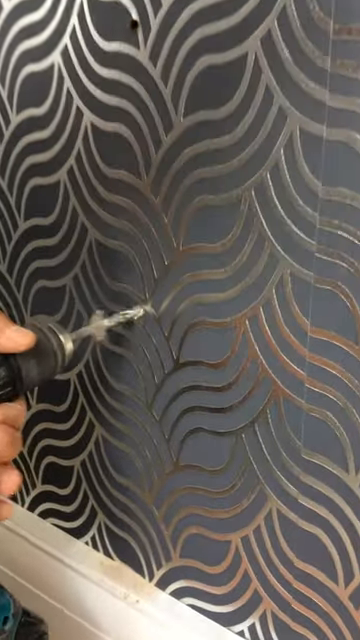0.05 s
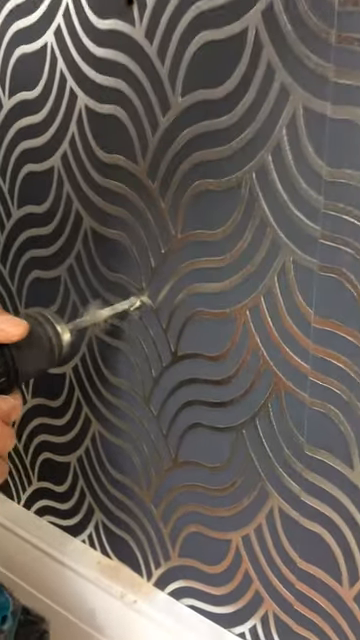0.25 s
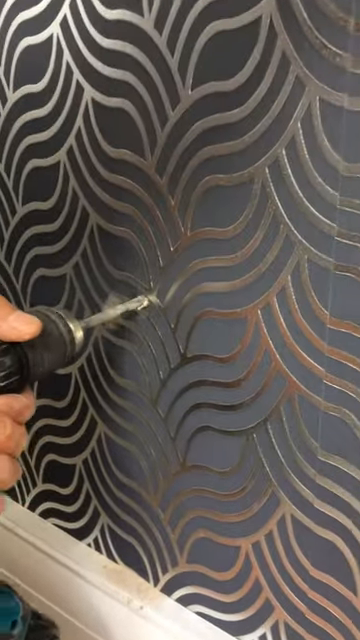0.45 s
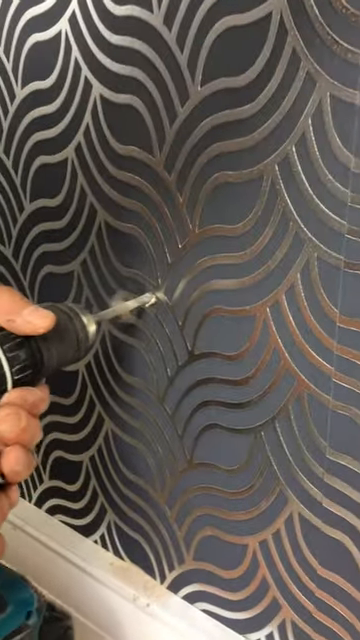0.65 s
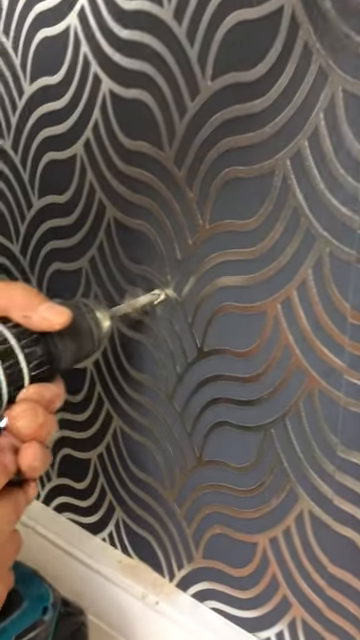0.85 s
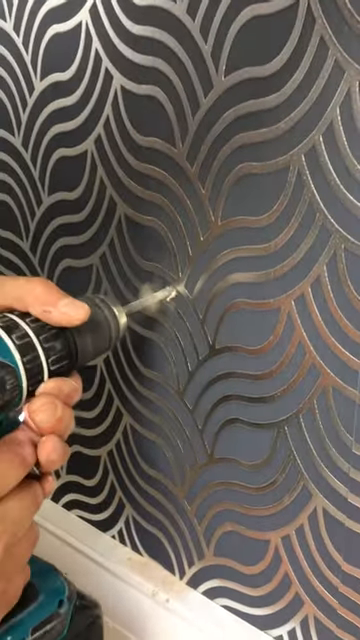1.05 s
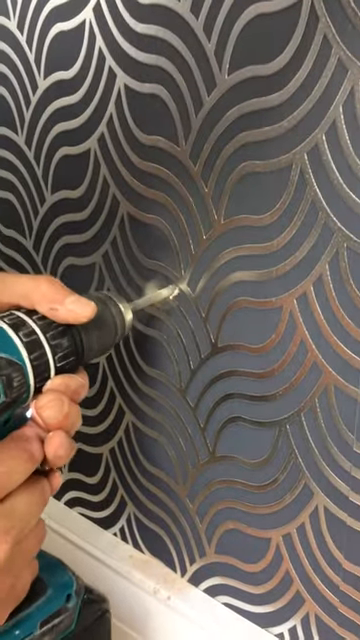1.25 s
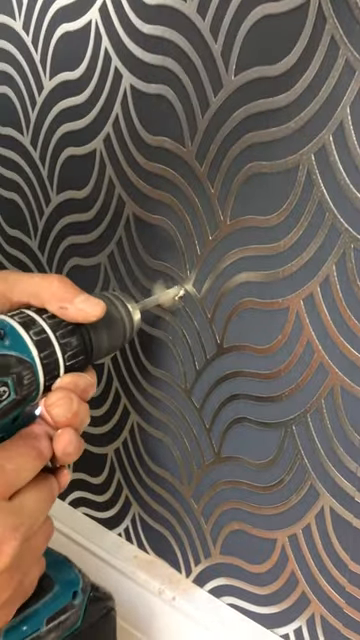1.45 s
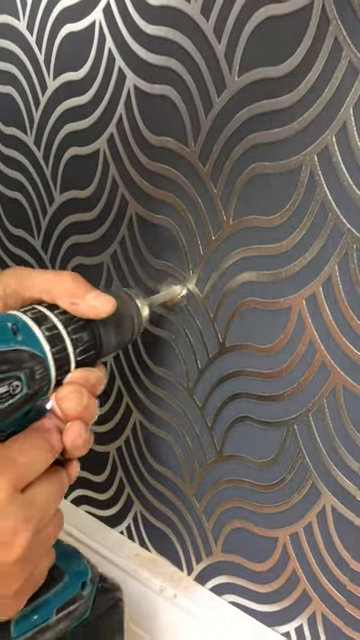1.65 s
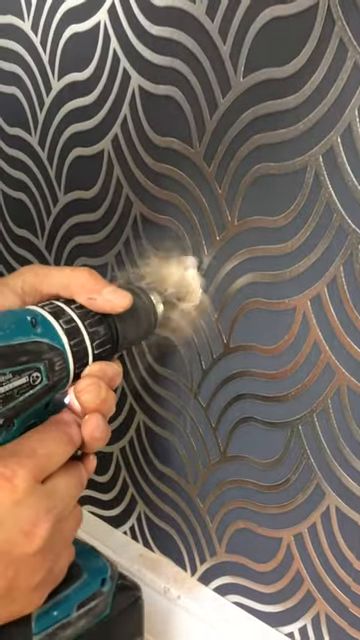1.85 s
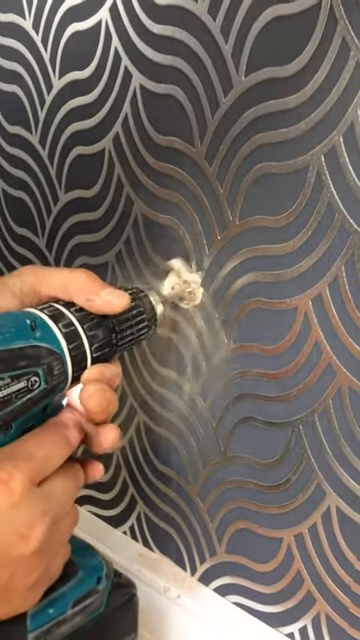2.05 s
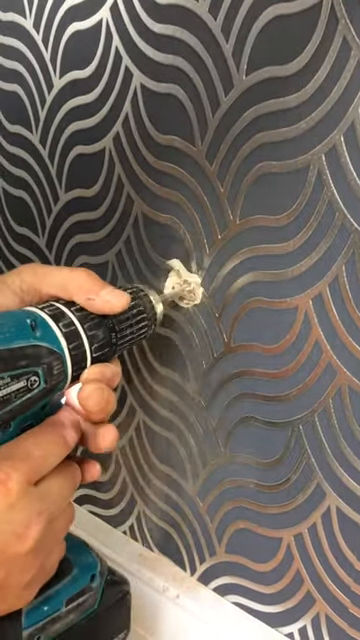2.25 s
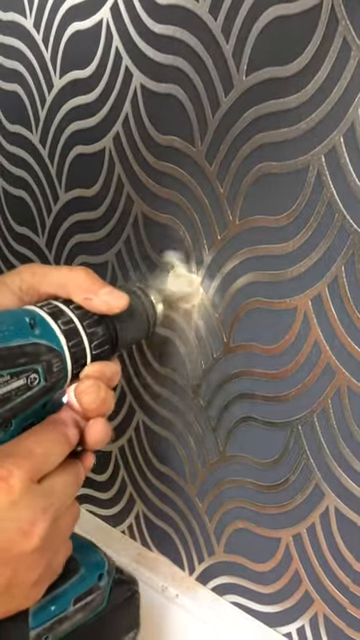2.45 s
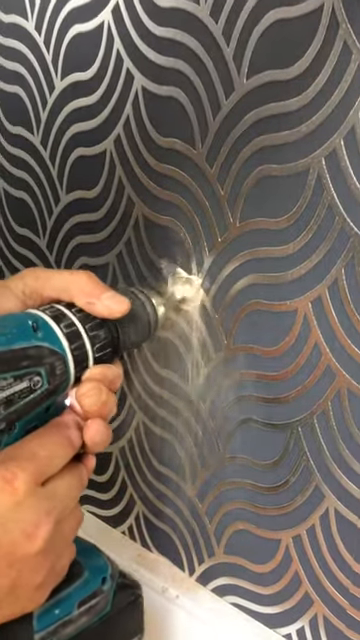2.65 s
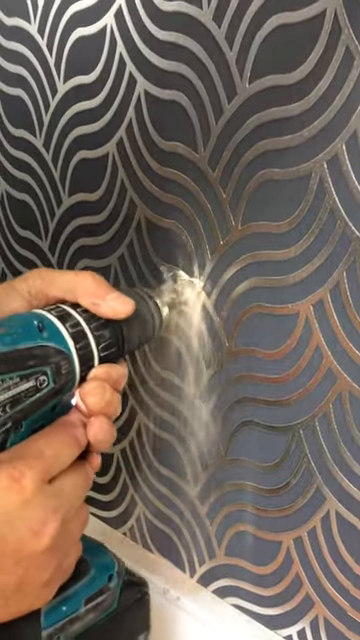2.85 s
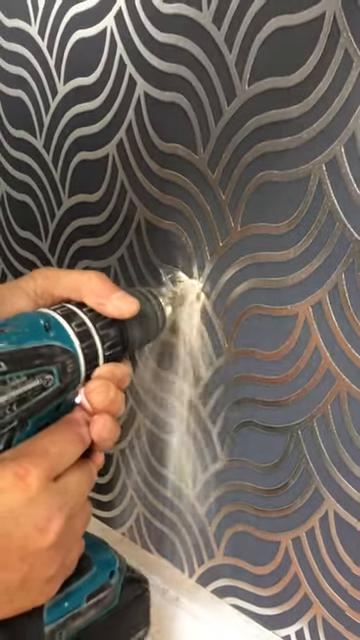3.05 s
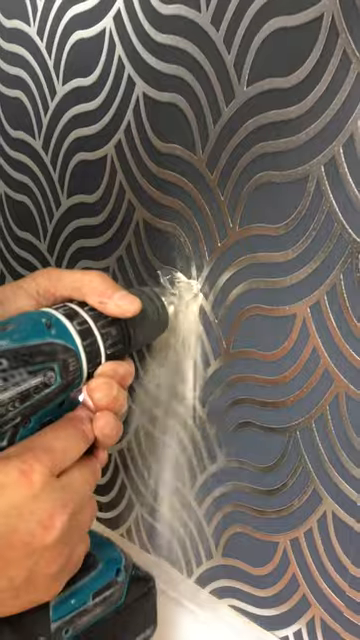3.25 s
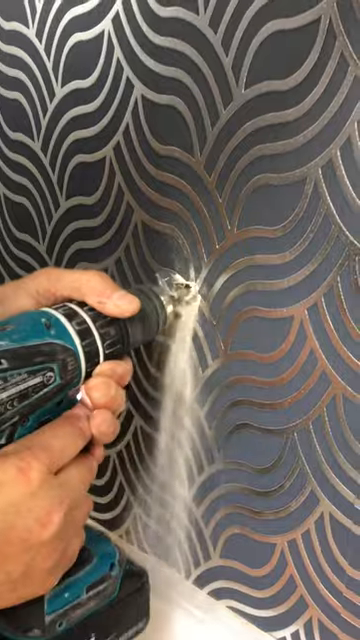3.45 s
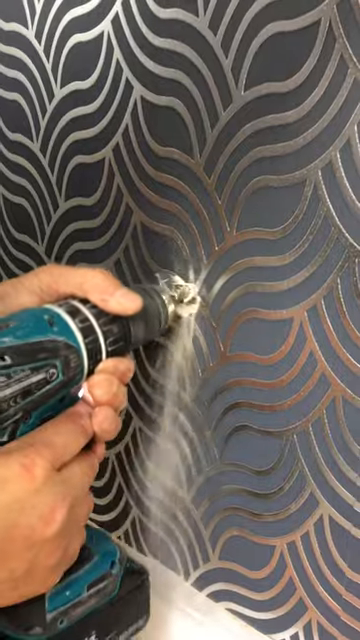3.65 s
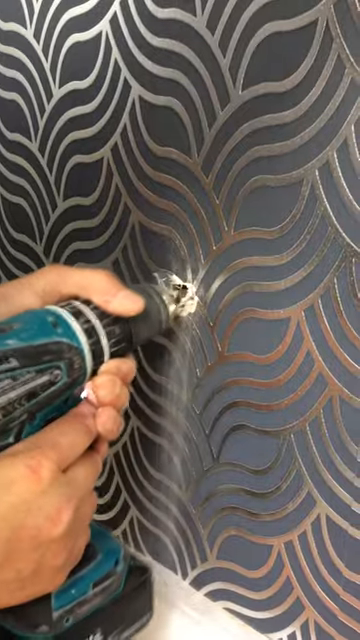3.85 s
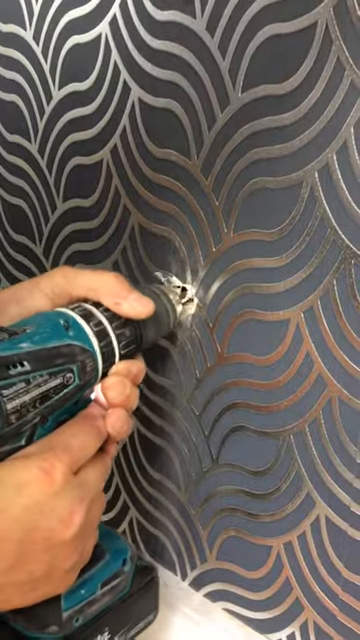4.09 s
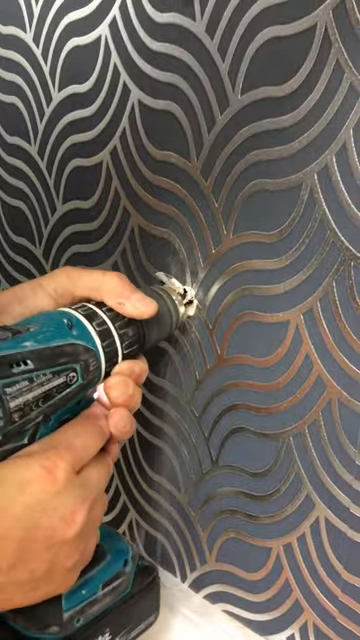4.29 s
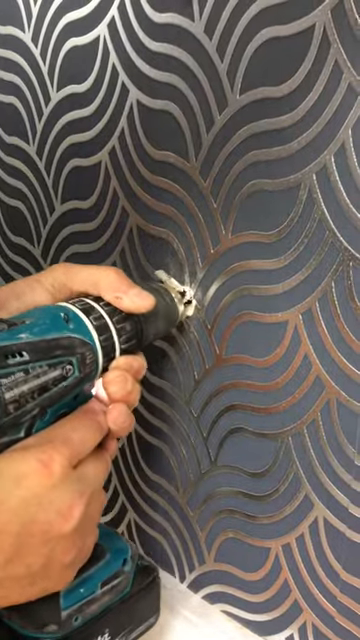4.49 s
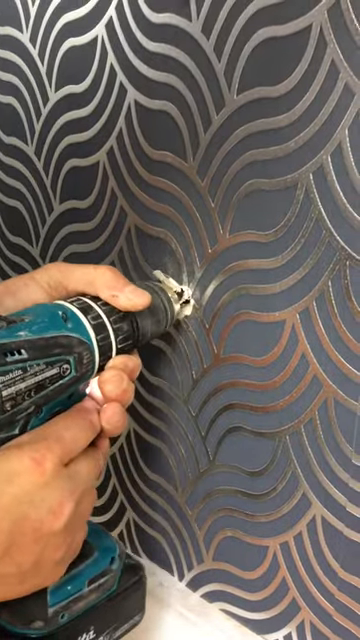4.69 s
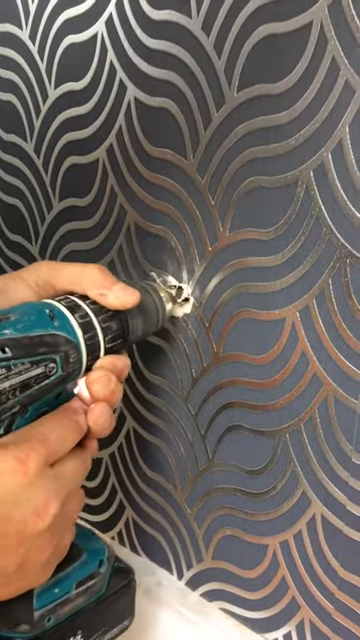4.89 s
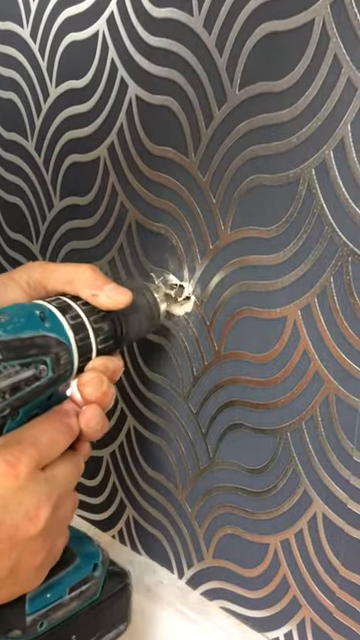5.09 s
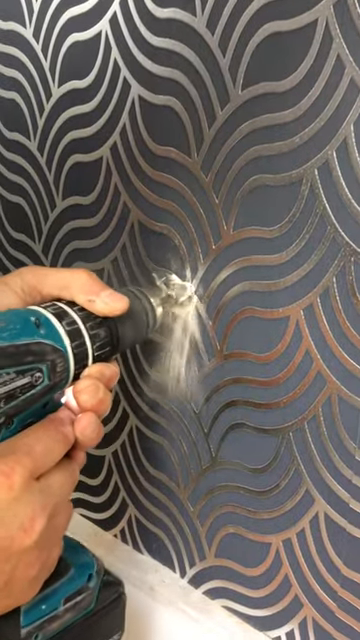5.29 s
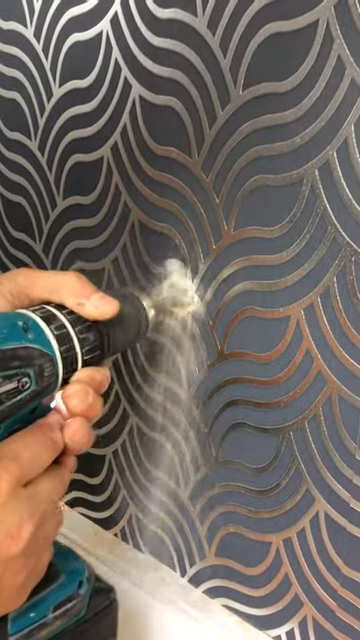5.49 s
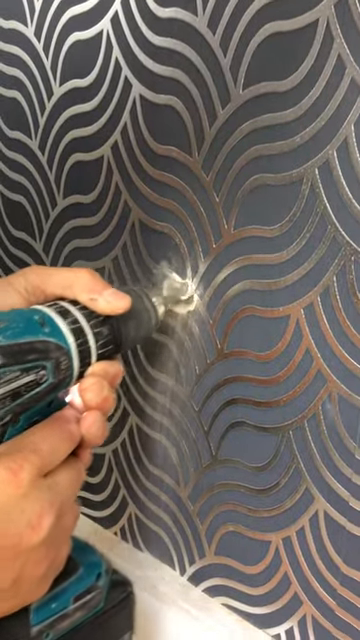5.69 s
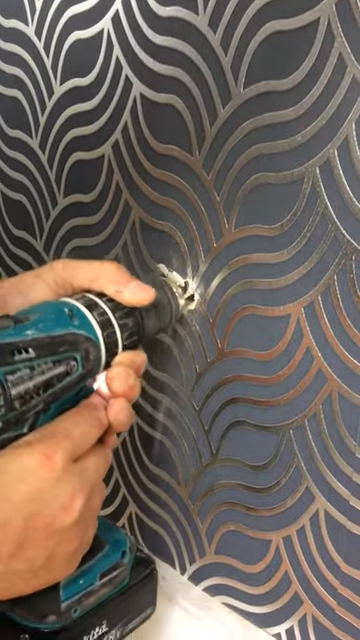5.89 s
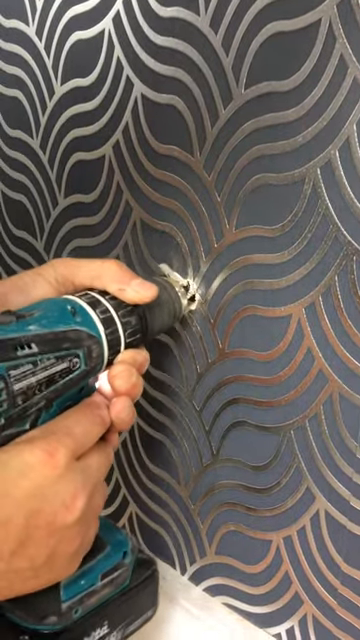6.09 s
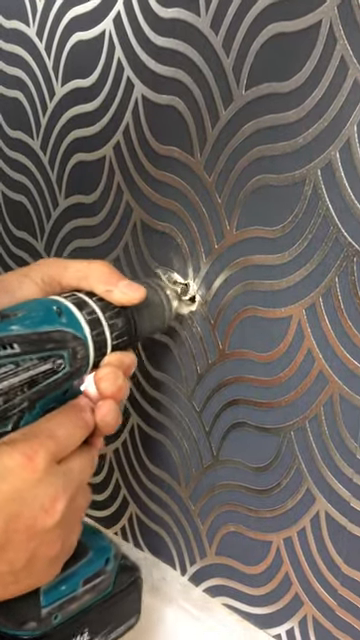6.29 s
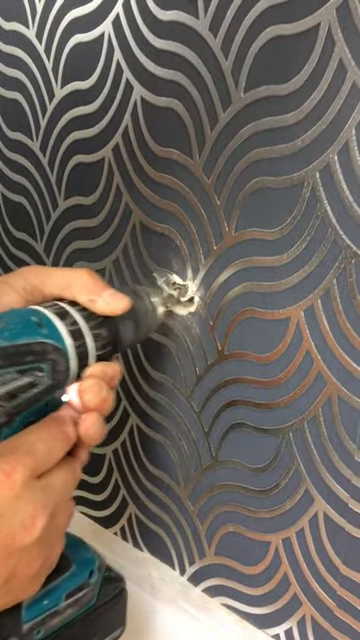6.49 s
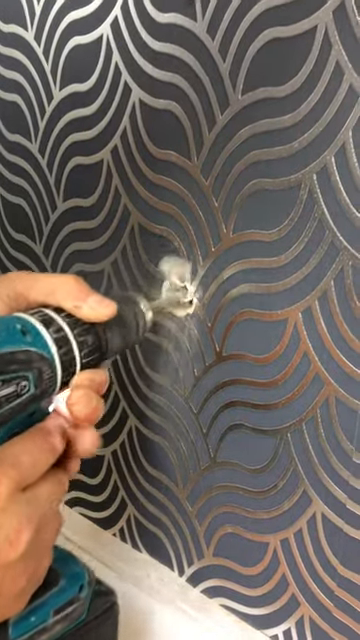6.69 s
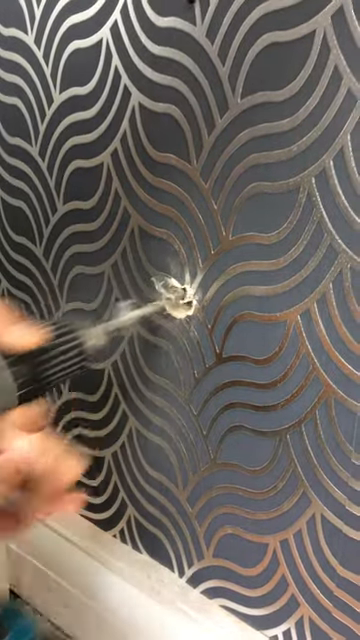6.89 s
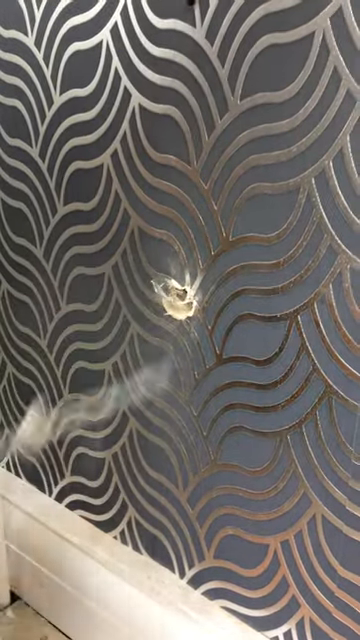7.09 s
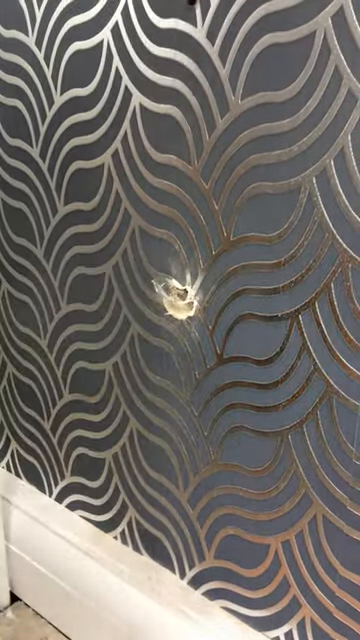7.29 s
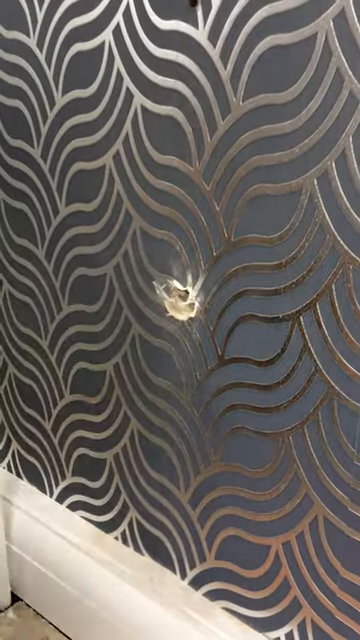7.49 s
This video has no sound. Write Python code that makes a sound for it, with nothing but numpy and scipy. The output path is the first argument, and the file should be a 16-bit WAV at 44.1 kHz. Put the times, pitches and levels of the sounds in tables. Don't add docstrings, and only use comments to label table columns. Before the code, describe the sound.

Close, centred sound of a hand-held electric drill boring into a wall indoors, with a short room tail. First a clear wavering whine over hissing dust and boxy board rumble, then a brief pause. A grinding masonry spell follows, chips cracking and the bit squeaking; the motor bogs, picks up again, slows and stops, leaving soft scrapes and clicks.

```python
import sys
import numpy as np
from scipy import signal
from scipy.fft import rfft, irfft, next_fast_len
from scipy.io import wavfile
from scipy.ndimage import uniform_filter1d

SR = 44100
rng = np.random.default_rng(int(sys.argv[2]) if len(sys.argv) > 2 else 0)


def master_out(mix):
    frames = np.transpose(np.atleast_2d(mix))
    ceiling = np.clip(frames, -1, 1)
    pcm = np.round(ceiling * 32767).astype(np.int16)
    wavfile.write(sys.argv[1], SR, pcm)


def gain_from_decibels(decibels):
    exponent = np.asarray(decibels, float) / 20
    return 10 ** exponent


N = 332514
TIME = np.arange(N) / SR

# time in seconds, tooth rate in Hz, bite in dB at 1000 Hz.
SPELLS = [
    [(0, 763, -33.5), (.6, 776.7, -31.5), (.85, 1304, -33.5), (.97, 1340, -32), (1.2, 1955, -33.5),
     (1.875, 1908, -34), (1.89, 1565, -33), (1.98, 1640, -32.5), (2.1, 752, -31)],
    [(2.39, 526.5, -32.5), (2.72, 729, -33), (2.85, 976, -33), (3.2, 948.5, -32), (3.33, 1471, -31),
     (3.86, 1518, -34), (4.06, 1378, -33), (4.54, 1439, -33.5), (4.68, 599, -35)],
    [(4.76, 478, -42.5), (4.83, 529, -35.5), (4.94, 1036, -32.5), (5.35, 1111, -34.5), (5.8, 1143, -38),
     (5.87, 1044, -33.5), (6.68, 995, -35.5), (6.75, 792, -32), (6.84, 555, -27.5), (6.97, 469, -32)],
]
# peak in seconds, change in Hz, rise and fall in seconds.
SURGES = [(.385, 1365, 0.14, 0.2), (.745, 1020.5, 0.13, 0.11), (1.05, 250, .06, .05), (1.1, 700, .11, .13),
          (1.3, -65, 0.084, 0.074), (1.69, -105, .32, 0.17), (2.54, 1050, 0.15, 0.13),
          (2.54, 170, 0.051, .05), (2.63, -200, 0.033, 0.044), (3.0, -120, 0.081, 0.086),
          (3.405, -300, 0.05, 0.07), (3.52, -110, 0.043, 0.045), (3.63, -90, 0.073, 0.068),
          (3.77, -85, 0.065, 0.066), (3.93, -185, 0.069, 0.06), (3.99, 60, 0.0402, 0.041),
          (4.12, 39.5, 0.084, 0.058), (4.33, 45, .15, 0.15), (4.5, -80, 0.029, 0.021),
          (5.49, -55, 0.12, 0.088), (5.7, 60, 0.13, 0.11), (6.08, -69, 0.098, 0.37)]
# up to speed in seconds, released in seconds, decay in dB per second.
POWER = [
    (0.014, 1.995, 132),
    (2.445, 6.656, 88),
]
SPIN_UP_DB_PER_S, STAGE_BLEND_S = 442, 0.0398

# start in seconds, rough share 0-1, then first, second and upper
# multiples of the tooth rate in dB re grind.
GEAR_LOADS_BOARD = [(0, 0.65, -13, -6, -9), (.26, 0.52, -1, -9, -16.5), (.335, 0.44, -4, -3, -11.5),
                    (.39, 0.46, -4.5, -2.5, -16), (.44, 0.5, -9, -14, -22), (.47, 0.61, -1, -11, -22),
                    (.54, 0.66, -19, -8.5, -15), (.63, 0.6, -3.5, -3, -20), (.69, 0.51, -10, -5, -17),
                    (.715, 0.47, -4, -1, -6), (.78, 0.4, -9, -3, -2), (.805, 0.36, -1, -6, -20),
                    (.84, 0.07, -6.5, -4, -12), (.97, 0.46, -5.5, -5, -13), (1.04, 0.67, -1, -16, -8),
                    (1.14, 0.36, -0.5, -4, -5.5), (1.25, 0.3, -9, -0.5, -6), (1.48, 0.27, -2.5, -0.5, -5),
                    (1.78, 0.23, -11.5, 1, -10), (1.88, 0.59, -0.5, -6, -12),
                    (1.91, 0.53, -5.5, -1.5, -12.5), (1.99, 0.55, -3, -2, -10), (2.03, 0.58, -10, -16, -13)]
# same columns, in seconds, share 0-1 and dB re grind.
GEAR_LOADS_BRICK = [(2.46, 0.46, 0.5, -2.5, -11), (2.52, 0.52, 1.5, -6, -9), (2.605, 0.81, -15, -9.5, -8.5),
                    (2.8, .7, -8, -17, -7), (2.855, 0.46, -5, -6, -13), (2.94, 0.74, -7.5, -3.5, -8.5),
                    (3.04, 0.65, -2.5, -5.5, -8), (3.12, 0.64, -9.5, -9, -13.5), (3.22, .5, -5.5, -7, -8.5),
                    (3.3, 0.6, -1.5, -5.5, -8), (3.41, .6, -5.5, -14, -14), (3.52, 0.6, -2.5, -6, -16),
                    (3.66, 0.72, -4.5, -8.5, -12), (3.89, 0.67, -11, -7, -11),
                    (4.04, 0.54, -8.5, -9, -11.5), (4.2, 0.4, -8, -8, -7.5), (4.3, 0.51, -6, -7, -11),
                    (4.44, 0.57, -8, -12, -10), (4.57, 0.7, -12, -12, -19), (4.78, 0.27, -19, -15, -19),
                    (4.865, 0.22, -3.5, -19, -12), (4.95, 0.46, -11, -20, -12), (5.15, 0.46, -13, -9, -12),
                    (5.33, .45, -10.5, -9, -8), (5.5, 0.28, -12, -24, -10), (5.85, 0.42, -12, -12, -18),
                    (6.22, 0.31, -11, -8, -13.5), (6.52, 0.32, -15, -13.5, -19),
                    (6.68, 0.4, -11.5, -15, -8), (6.8, .4, -7.5, -14, -12)]
# multiple, level in dB re a strong one, index of that one
SIDE_ORDERS = [(.5, -19.5, 1.5), (0.749, -18, -1.5), (1.5, -12, 1), (2.96, 3, 2), (3.95, -3, 2),
               (4.95, -3.5, 2.2)]
# centre in Hz, width in Hz, gain in dB.
SHELL = [(610, 220, 4), (1010, 100, 2.5), (1530, 82, 1), (1724, 310, -2.5), (2200, 250, -1),
         (2480, 220, -1.5), (2850, 260, -0.5), (3280, 240, -1.5), (3740, 340, -2), (4800, 350, 7.5),
         (5100, 210, 8.5), (5500, 270, -5.5), (6660, 330, 2)]
# centre in Hz, width in Hz, level in dB.
HOUSING = [
    (1480, 250, 0),
    (4150, 600, -2),
]

# start in seconds, dust in dB re grind,
# board in dB re bite, wall boom in dB.
LAYERS = [(0, -2.5, -15, -54.5), (.3, -5.5, -16.5, -52.5), (.45, -5.5, -17, -51.5), (.65, -5.5, -17, -52),
          (1.0, -5, -17, -50), (1.3, -6, -15.5, -52.5), (2.3, -8.5, -14, -49.5), (2.6, -5, -12, -53),
          (2.72, -11, -15, -57), (2.78, -5.5, -13, -54.5), (2.95, -7, -13, -54), (3.2, -9, -12.5, -57),
          (4.0, -7.5, -12.5, -49), (4.75, -9.5, -12.5, -58.5), (5.05, -7.5, -14, -54),
          (5.2, -8, -15.5, -56.5), (5.5, -7, -16.5, -64), (6.3, -7, -15.5, -58.5)]
# peak in seconds, boom in dB, rise and fall in seconds.
PUSHES = [(.29, -49, 0.014, 0.15), (1.87, -44.5, 0.045, 0.21), (2.06, -60.5, 0.058, 0.16),
          (2.54, -52, 0.13, 0.094), (3.35, -52, 0.29, 0.23), (3.9, -45, 0.85, 0.22),
          (4.38, -39.5, 0.068, 0.22), (4.55, -39, 0.22, 0.16), (6.0, -52.5, 0.29, 0.11),
          (6.14, -40.5, 0.17, 0.19)]
# peak in seconds, level in dB, rise and fall in seconds.
CRUNCHES = [(.3, -42, 0.018, 0.06), (.385, -43, .07, 0.069), (.53, -45, .04, 0.043),
            (2.402, -56, .003, 0.037), (2.92, -50, 0.031, 0.04), (4.55, -45, 0.041, 0.05),
            (4.64, -41, 0.031, 0.046), (5.0, -49, 0.03, 0.022), (6.83, -52, 0.18, 0.062),
            (6.96, -54.5, 0.018, 0.045), (7.14, -61, 0.079, .02), (7.504, -45, .006, 0.033)]
PUSH_BOARD_DB, CRUNCH_DUST_DB, QUIET_BOOM_DB = -7, -7.5, -77.5
GRIND_DB_PER_OCTAVE, DUST_DB_PER_OCTAVE, BOARD_DB_PER_OCTAVE = 5.5, 4, 1.5
# frequency in Hz, density in dB per Hz.
GRIND = [(530, -46), (900, -22.5), (1030, -1), (1260, -8.5), (1510, 1.5), (1780, -3), (2120, -2),
         (2600, -1.5), (3400, 0.5), (4010, 4.5), (6060, -3.5), (7860, -15), (9000, -17), (11700, -32),
         (19800, -120)]
# frequency in Hz, density in dB per Hz.
DUST = [(3530, -42), (6000, -2), (7410, 6.5), (11400, 1), (13200, -3.5), (14700, -8.5), (15500, -1.5),
        (15800, -32)]
# frequency in Hz, density in dB per Hz.
BOARD = [(160, -46), (280, -28), (323, -19.5), (383, -0.5), (433, -2), (490, 1.5), (779, -2.5), (1000, -1),
         (1300, -1), (2200, -120)]
# frequency in Hz, density in dB per Hz.
BOOM = [(15, -45.5), (28, -25), (73, -6), (119, -7), (203, 1), (252, -6.5), (313, -8.5), (343, -23.5),
        (380, -5.5), (490, -47), (840, -120)]

# start in seconds, peak in dB, pitch in Hz, build-up in seconds, chatter share 0-1.
SQUEAKS = [(0.3697, -7.5, 3900, 0.0048, 0.2), (4.0678, -32, 1970, .006, 0.64),
           (4.08, -28, 1830, 0.0075, 0.85), (4.121, -25, 2080, 0.0053, 0.25),
           (4.129, -14.5, 2160, 0.0088, 0.2), (4.146, -18, 2160, 0.007, 0.6),
           (4.2441, -13, 2152, 0.0064, 0.6), (4.5651, -18, 2038, 0.0061, .3),
           (4.6074, -34, 2020, 0.0057, 0.49), (4.856, -17.5, 2660, 0.007, 0.35),
           (4.8999, -32, 2720, 0.0045, 0.39), (4.9862, -34, 1990, 0.0046, 0.39),
           (4.9974, -25.5, 2060, 0.0061, 0.21), (5.0982, -15.5, 2595, 0.003, 0.27),
           (5.109, -24, 2480, 0.0047, 0.31), (5.131, -30, 2250, 0.008, 0.43),
           (5.153, -27, 2495, 0.0047, .3), (5.1615, -28, 2340, 0.0047, 0.9),
           (5.195, -37, 2330, 0.0081, 0.73), (5.2681, -32.5, 2170, 0.012, 0.65),
           (5.7669, -34, 2251, 0.0069, 0.2), (5.9545, -29, 1866, 0.0059, 0.48),
           (6.154, -16, 1876, 0.0074, 0.62), (6.2972, -29, 2375, 0.0065, .4),
           (6.3114, -23.5, 2420, 0.0062, 0.5), (6.3943, -30, 2620, 0.0064, 0.33),
           (6.4274, -33.5, 2017, 0.0063, 0.52), (6.444, -27.5, 2134, 0.01, 0.5),
           (6.463, -14.5, 2606, 0.0076, 0.4), (6.501, -35, 2604, 0.0062, 0.75),
           (6.532, -39, 2514, 0.0067, 0.42)]
# start in seconds, peak in dB, bass in dB re peak.
CHIPS = [(0.0084, -33, -17), (0.1674, -12.5, -9), (0.2903, -12, -36), (0.301, -22, -34), (1.87, -25, -18),
         (1.969, -10, -7), (2.059, -15.5, 2.5), (2.2923, -40.5, -14), (2.3998, -47, -21), (2.4195, -42, 5),
         (2.4898, -12, -15), (2.819, -26, -20), (2.8815, -14, -20), (2.9108, -8.5, -2), (2.924, -11, 0),
         (2.931, -16, -18), (3.0009, -13, -21), (3.27, -13, -14), (4.9029, -20, -18), (5.3456, -23, -18),
         (5.7456, -19, -18), (3.172, -19, -6), (3.1997, -13.5, -10), (3.647, -18, -9), (3.9505, -19, -15),
         (4.0435, -28, -7), (4.5189, -21, -12), (5.5439, -16.5, -1), (7.112, -41, -10), (7.36, -50, -11),
         (7.378, -52, 11), (7.506, -39, -10), (3.3544, -14.5, 8), (3.4879, -11.5, 9), (3.8585, -17, 13),
         (4.455, -9.5, -15), (4.6588, -11.5, -3), (4.851, -19.5, -19), (5.8403, -15, 8.5),
         (5.9784, -15, -18), (6.2944, -19, -21), (6.5564, -29, -18), (6.9138, -35, -4), (6.961, -40, -3.5),
         (7.0288, -37, 11), (7.432, -43, -12), (7.468, -44, -9), (7.5, -30, -11), (7.53, -41, 18)]
# start in seconds, peak in dB, pitch in Hz, length in seconds.
RUBS = [(.03, -32, 5350, .05), (0.089, -31, 5300, 0.055), (0.096, -27, 2250, .02), (7.465, -49, 2950, .015),
        (7.02, -52, 3550, .06), (7.15, -58, 1950, .07), (0.171, -21.5, 4300, 0.035),
        (0.294, -24.5, 4650, .02), (0.398, -31, 3860, 0.026), (0.461, -28, 4400, 0.035),
        (0.647, -21, 4360, .03), (0.804, -18, 4520, 0.018), (3.189, -18, 2754, 0.02),
        (4.827, -29, 1554, 0.044), (5.068, -34, 1527, 0.026), (6.913, -47, 2447, .015),
        (7.001, -50, 3940, 0.054), (7.17, -57, 4100, 0.061), (7.232, -55.5, 3850, .04),
        (2.355, -49, 1510, 0.029), (2.689, -27, 685, 0.019), (2.745, -22, 623, 0.016),
        (2.93, -28, 617, 0.039), (6.723, -31, 1570, 0.033), (6.781, -42, 1460, 0.08),
        (6.829, -45, 554, 0.029), (6.861, -40, 1471, 0.032), (6.924, -35.5, 1620, 0.026),
        (6.957, -40, 1480, 0.03), (7.032, -50, 1440, 0.02), (7.124, -60, 796, 0.031),
        (7.217, -55, 1870, 0.032), (7.247, -50, 1360, 0.039), (7.34, -60.5, 1800, 0.025)]
# start in seconds, peak in dB, pitch in Hz.
THUDS = [(2.49, -39, 112.5), (3.292, -33, 74.04), (3.341, -31, 87.8), (3.679, -37, 90.5),
         (3.789, -43, 80.5), (4.141, -51, 111.5), (4.355, -30, 209.9), (4.42, -33, 190),
         (4.458, -41, 105.5), (4.47, -29, 205), (4.535, -28, 197), (6.02, -38, 190), (6.13, -33, 200),
         (6.2, -37, 190.2), (5.13, -48, 87.9), (5.926, -47, 77.8), (6.12, -44, 100.4)]
# time in seconds, turn rate in Hz, level in dB.
BUZZ = [
    [(2.62, 125.7, -67), (2.68, 125.5, -46.5), (3.1, 124.5, -51), (3.2, 127.2, -55)],
    [(4.7, 123.6, -73), (4.74, 121.8, -46.5), (4.86, 121.3, -47), (4.92, 120.1, -76)],
]
# time in seconds, pitch in Hz, level in dB.
WHISTLE = [
    (2.2, 2373, -68),
    (2.27, 2370, -71),
    (2.35, 2330, -66),
    (2.375, 2343, -95),
]

ROOM_T60_S, ROOM_DB, ROOM_DULL_HZ = 0.38, -14, 6040
# time in seconds, level in dB.
ROOM_NOISE = [
    (2.3, -61),
    (7.05, -60),
    (7.4, -65.5),
]
# peak in seconds, level in dB, rise and fall in seconds.
RUSTLES = [
    (7.13, -79, 0.06, 0.034),
    (7.28, -68, 0.13, 0.043),
    (7.37, -64, 0.036, 0.02),
    (7.475, -61, 0.0075, .15),
]
# frequency in Hz, density in dB per Hz.
FLOOR = [(15, -43), (25, -21), (87, -2), (235, -30.5), (325, -7.5), (792, -21), (1400, -19.5),
         (3200, -20.5), (4000, -23.5), (4800, -24.5), (6000, -24.5), (13500, -31), (15800, -38.5)]
TOP_HZ = 15130


def level(x):
    return x / np.sqrt(np.mean(x ** 2))


def curves(tables):
    s, *columns = np.transpose(np.vstack(tables))
    return [np.interp(TIME, s, c) for c in columns]


def stages(rows):
    s, *columns = np.transpose(rows)
    now = np.maximum(np.searchsorted(s, TIME, "right") - 1, 0)
    return [uniform_filter1d(c[now], int(STAGE_BLEND_S * SR)) for c in columns]


def swells(rows, size=lambda v: v):
    total = 0
    for s, v, rise, fall in rows:
        position = (TIME - s) / np.where(TIME < s, rise, fall)
        total = total + size(v) * np.cos(np.pi / 2 * np.clip(position, -1, 1)) ** 2
    return total


def walk(rate_hz):
    k = int(SR / rate_hz)
    held = np.repeat(rng.standard_normal(N // k + 1), k)
    return 1.3 * uniform_filter1d(uniform_filter1d(held, k), k)[:N]


def colour(x, points):
    size = next_fast_len(N)
    log_hz = np.log(np.arange(size // 2 + 1) * SR / size + 1)
    f, db = np.log(np.array(points)[:, 0]), np.array(points)[:, 1]
    outside = np.maximum(f[0] - log_hz, 0) + np.maximum(log_hz - f[-1], 0)
    gain = gain_from_decibels(np.interp(log_hz, f, db) - 60 * outside)
    return level(irfft(rfft(x, size) * gain, size)[:N])


def ring(x, hz, width_hz):
    return signal.lfilter(*signal.iirpeak(hz, hz / width_hz, SR), x)


def place(out, s, sound):
    i = int(s * SR)
    out[i:i + len(sound)] += sound[:N - i]


def motor():
    hz, bite_db = curves(SPELLS)
    hz = uniform_filter1d(hz + swells(SURGES), 400)
    spells_db = []
    for on, off, decay in POWER:
        ramp_db = np.minimum(SPIN_UP_DB_PER_S * (TIME - on), decay * (off - TIME))
        spells_db.append(np.minimum(0, ramp_db))
    power_db = np.max(spells_db, axis=0)
    return hz, np.log2(hz / 1000), bite_db + power_db, power_db


def gears(hz, grind_db):
    rough, *strong_db = stages(GEAR_LOADS_BOARD + GEAR_LOADS_BRICK)
    shiver_percent = 5.5 * rough ** 2
    wander = 0.7 * walk(35) + 0.705 * walk(180)
    turns = np.cumsum(hz * (1 + shiver_percent / 100 * wander)) / SR
    grid_hz = np.arange(0, SR / 2, 10)
    shell_db = sum(db / (1 + (2 * (grid_hz - f) / width) ** 2) for f, width, db in SHELL)
    whine = 0
    for k, db, j in [(1, 0, 0), (2, 0, 1)] + SIDE_ORDERS:
        share = np.clip(rough + 0.17 * (k - 1), 0, 1)
        skirt_hz = 140 + 120 * k
        skirt = (walk(skirt_hz) + 1j * walk(skirt_hz)) / np.sqrt(2)
        tone = (np.sqrt(1 - share) + np.sqrt(share) * skirt) * np.exp(2j * np.pi * k * turns)
        flutter_db = 5.2 * rough * walk(50) + 1.0 * rough * walk(18)
        tone_db = db + strong_db[int(j)] + np.interp(k * hz, grid_hz, shell_db) + flutter_db
        whine = whine + gain_from_decibels(tone_db) * tone.real
    return housing(whine * gain_from_decibels(grind_db), 0)


def housing(x, lift_db):
    return x + sum(gain_from_decibels(db + lift_db) * ring(x, hz, width) for hz, width, db in HOUSING)


def grit(per_s, spread_db, share):
    size_db = spread_db * np.minimum(rng.exponential(size=N), 3.5)
    hits = (rng.random(N) < per_s / SR) * gain_from_decibels(size_db)
    burst = signal.lfilter([1], [1, -np.exp(-1 / (0.0025 * SR))], hits)
    return rng.standard_normal(N) * (1.5 + share * level(burst))


def cutting(chuck_hz, octaves, feed_db, power_db):
    dust_db, board_db, boom_db = stages(LAYERS)
    cut = gain_from_decibels(feed_db + GRIND_DB_PER_OCTAVE * octaves)
    crunch, push = swells(CRUNCHES, gain_from_decibels), swells(PUSHES, gain_from_decibels)
    turn = np.cos(2 * np.pi * np.cumsum(chuck_hz * (1 + 0.16 * walk(12))) / SR)
    grains = grit(610, 2.6, 0.42)
    bite_db = 0.87 * walk(14)

    grind = level(housing(colour(grains, GRIND), -35.0))
    grind = grind * gain_from_decibels(1.0 * walk(24.95) + bite_db) * (cut + crunch)

    dust_size = cut * gain_from_decibels(dust_db + DUST_DB_PER_OCTAVE * octaves) + crunch * gain_from_decibels(CRUNCH_DUST_DB)
    dust = colour(grains, DUST) * gain_from_decibels(1.25 * walk(30) + bite_db) * dust_size

    board_size = gain_from_decibels(feed_db + board_db + BOARD_DB_PER_OCTAVE * octaves) + push * gain_from_decibels(PUSH_BOARD_DB)
    board = colour(grit(300, 0.81, 0.82), BOARD) * gain_from_decibels(1.5 * walk(18) + 1.5 * turn) * board_size

    boom_size = gain_from_decibels(boom_db + power_db) + push + gain_from_decibels(QUIET_BOOM_DB)
    boom = colour(grit(180, 2.8, 0.51), BOOM) * gain_from_decibels(2.0 * turn + 0.28 * walk(23)) * boom_size
    return grind + dust + board + boom


def squeaks():
    out = np.zeros(N)
    t = np.arange(int(0.09 * SR)) / SR
    for (s, db, hz, rise, share), chance in zip(SQUEAKS, rng.random((len(SQUEAKS), 2))):
        after = np.maximum(t - rise, 0)
        chatter_hz = 100 + 40 * chance[0]
        chatter = 0.55 - 0.46 * np.cos(2 * np.pi * chatter_hz * after)
        chatter = 1.6 * share * chatter * np.exp(-after / 0.016)
        build = np.minimum(t / 0.00098, 1) * (0.51 + 0.5 * t / rise)
        shape = np.where(t < rise, build, chatter + 0.56 * np.exp(-after / 0.00097))
        wobble = 1.26 * np.sin(2 * np.pi * 70 * after)
        phase = 2 * np.pi * hz * (t - 0.34 * t ** 2) + wobble
        tone = np.sin(phase) + 0.25 * np.sin(2 * phase + 6 * chance[1])
        place(out, s, gain_from_decibels(db) * shape * tone)
    return out


def chips():
    out = np.zeros(N)
    t = np.arange(int(0.06 * SR)) / SR
    bright = signal.butter(1, (2800, 9000), "band", fs=SR, output="sos")
    dull = signal.butter(2, (300, 2000), "band", fs=SR, output="sos")
    for (s, db, bass_db), noise in zip(CHIPS, rng.standard_normal((len(CHIPS), len(t)))):
        crack = level(signal.sosfilt(bright, noise))
        knock = gain_from_decibels(bass_db - 9.5) * level(signal.sosfilt(dull, noise))
        place(out, s, gain_from_decibels(db - 14.5) * (crack + knock) * np.exp(-t / 0.012))
    return out


def rubs():
    out = np.zeros(N)
    t = np.arange(int(0.15 * SR)) / SR
    for (s, db, hz, length), noise in zip(RUBS, rng.standard_normal((len(RUBS), len(t)))):
        puff = t / length * np.exp(1 - 2 * t / length)
        place(out, s, gain_from_decibels(db - 6.5) * level(ring(noise, hz, 0.047 * hz)) * puff)
    return out


def thuds():
    out = np.zeros(N)
    t = TIME[:int(0.25 * SR)]
    swing = t / 0.029 * np.exp(1 - t / 0.016)
    for s, db, hz in THUDS:
        place(out, s, gain_from_decibels(db) * np.sin(2 * np.pi * hz * t) * swing)
    return out


def buzz():
    hz, db = curves(BUZZ)
    phase = 2 * np.pi * np.cumsum(hz * (1 + 0.00397 * walk(40))) / SR
    kicks = sum(np.cos(k * phase) for k in range(1, 42))
    modes = [(110, 7.0), (250, -4.0), (450, 7.5), (620, -1.5), (740, 4.5), (900, -9.0),
             (1800, -6.0), (3500, -20.0), (5000, 2.5)]
    return gain_from_decibels(db) * colour(kicks, modes)


def whistle():
    hz, db = curves([WHISTLE])
    phase = 2 * np.pi * np.cumsum(hz * (1 + 0.004 * walk(30))) / SR
    return gain_from_decibels(db) * (np.sin(phase) + gain_from_decibels(2.5) * np.sin(2 * phase))


def room_tail(drill):
    t = TIME[:int(0.6 * SR)]
    decay = np.exp(-np.log(1000) * t / ROOM_T60_S)
    tail = rng.standard_normal(len(t)) * decay * (t > 0.004)
    tail = signal.lfilter(*signal.butter(1, ROOM_DULL_HZ, fs=SR), tail)
    return gain_from_decibels(ROOM_DB) * signal.fftconvolve(drill, tail / np.sqrt(np.sum(tail ** 2)))[:N]


def quiet_floor():
    size = gain_from_decibels(curves([ROOM_NOISE])[0]) + swells(RUSTLES, gain_from_decibels)
    return size * gain_from_decibels(1.0 * walk(51)) * colour(rng.standard_normal(N), FLOOR)


def scene():
    hz, octaves, feed_db, power_db = motor()
    whine = gears(hz, feed_db + GRIND_DB_PER_OCTAVE * octaves)
    chuck_hz = hz / 70
    drill = whine + cutting(chuck_hz, octaves, feed_db, power_db)
    drill = drill + squeaks() + chips() + rubs() + thuds() + buzz() + whistle()
    mono = drill + room_tail(drill) + quiet_floor()
    return np.array([mono, mono])


def band_limit(x):
    return signal.sosfilt(signal.butter(12, 16000, fs=SR, output="sos"), x)


def record(dry):
    top_cut = signal.ellip(10, 0.2, 70, TOP_HZ, fs=SR, output="sos")
    return band_limit(signal.sosfilt(top_cut, dry))


dry = scene()
out = record(dry)
master_out(out)
```